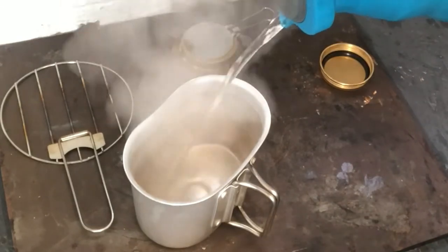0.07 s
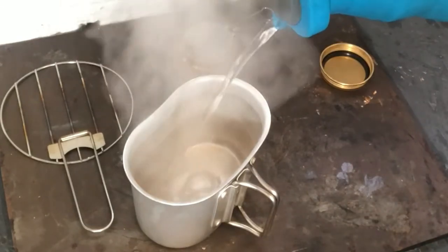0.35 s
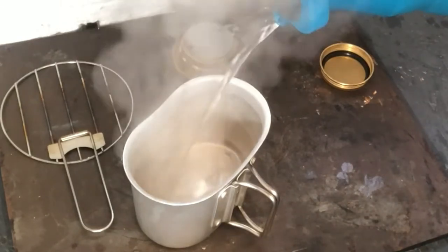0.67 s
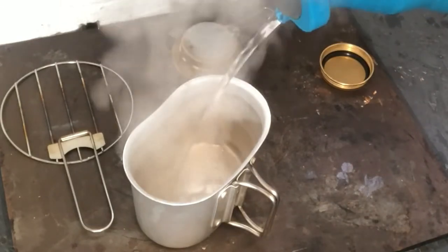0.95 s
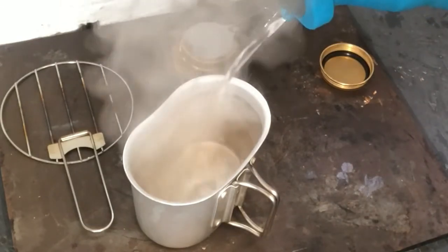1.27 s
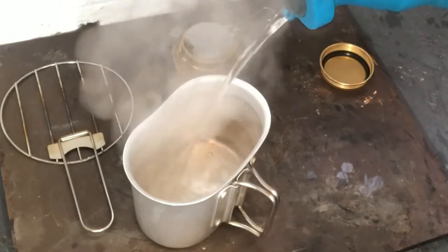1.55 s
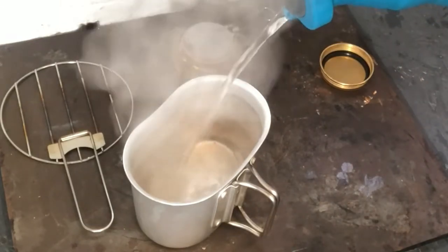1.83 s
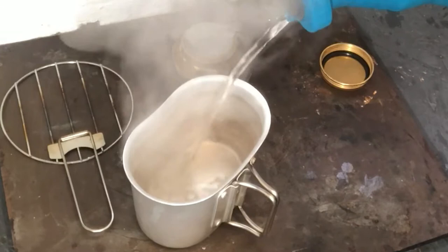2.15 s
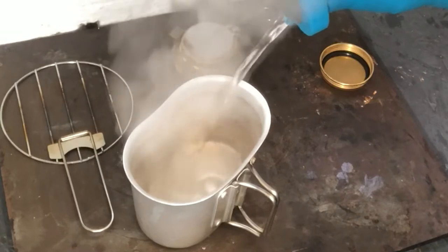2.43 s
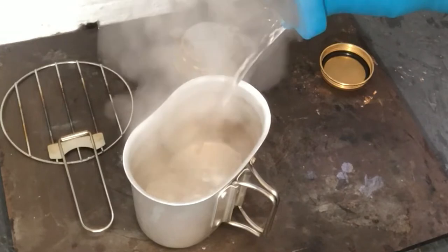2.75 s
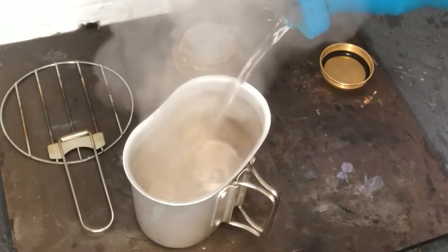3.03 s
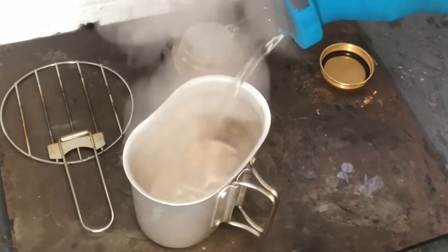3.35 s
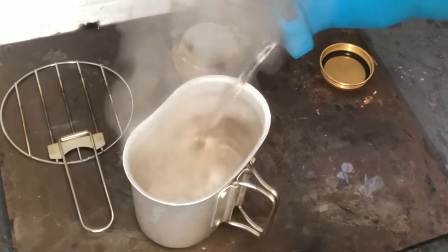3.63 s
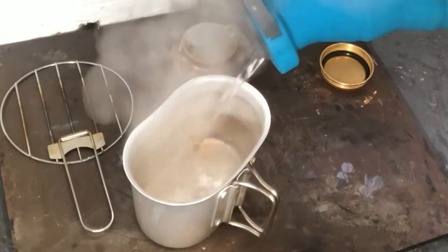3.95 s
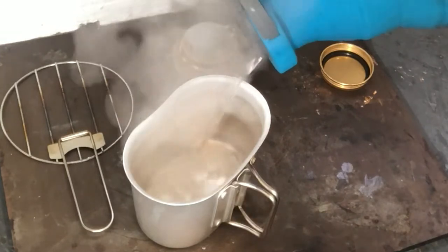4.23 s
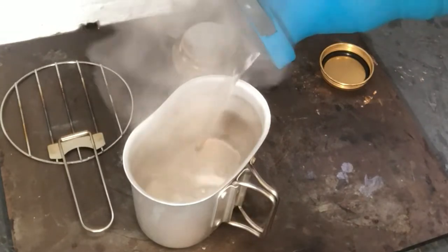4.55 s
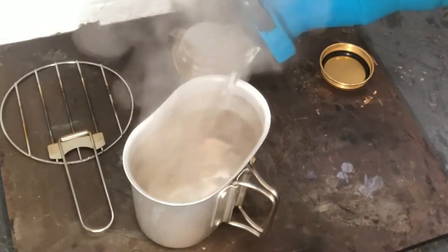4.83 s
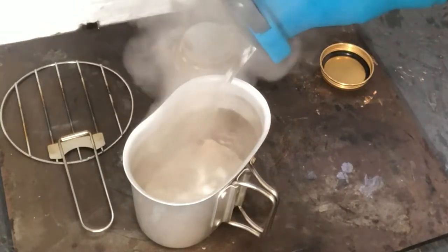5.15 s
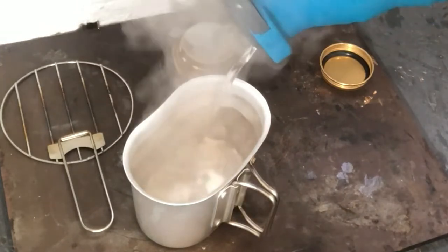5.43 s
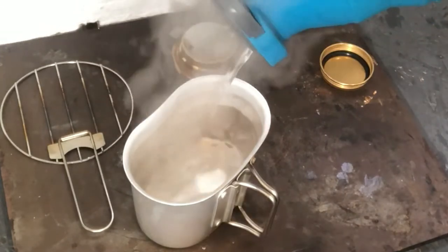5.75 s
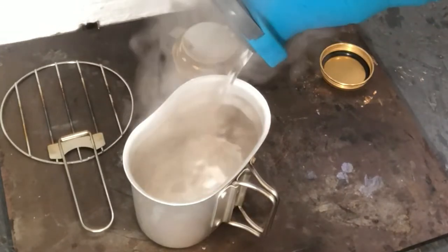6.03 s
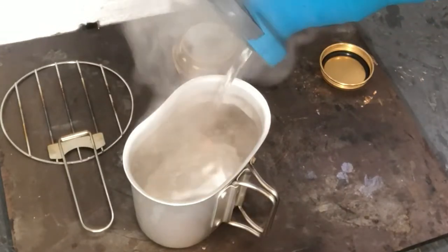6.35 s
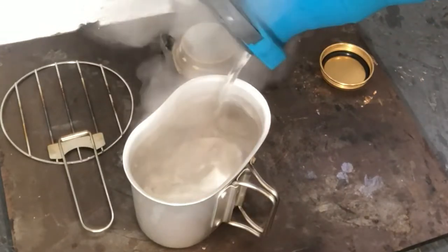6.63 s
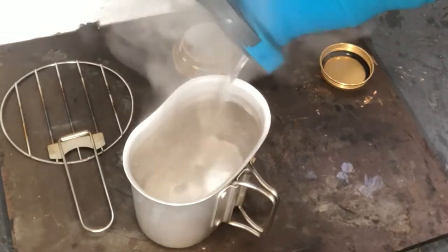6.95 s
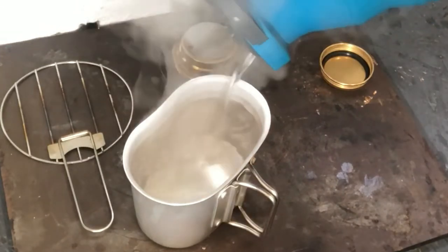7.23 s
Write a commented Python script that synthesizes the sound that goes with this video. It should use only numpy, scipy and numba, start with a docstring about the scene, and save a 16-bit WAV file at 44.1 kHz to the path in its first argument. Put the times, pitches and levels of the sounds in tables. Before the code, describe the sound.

Close stream of water drums and spatters into a metal cup, turning into a softer, rising gurgle, with a few dull handling knocks.

```python
"""Hot water runs from a kettle into a metal cup, close to a hand-held phone in a small room.
At first the stream drums on the bottom and spray ticks on the metal wall; all along, the flow surges
and handling knocks reach the microphone as low thumps. Drumming and spray fade as the bottom is covered.
Trapped bubbles ring the air in the cup, higher as it fills. Near the end, fine froth gathers
and a thin, faint whistle passes."""
import sys
import numpy as np
from scipy import signal
from scipy.fft import rfft, irfft
from scipy.io import wavfile
from scipy.ndimage import uniform_filter1d
from numba import njit

SR = 44100
rng = np.random.default_rng(int(sys.argv[2]) if len(sys.argv) > 2 else 0)


def transcribe(signal):
    """Save signal, clipped to [-1, 1], as a 16-bit WAV file at the path in sys.argv[1]."""
    frames = np.atleast_2d(signal).T
    limited = np.clip(frames, -1, 1)
    pcm = np.round(limited * 32767).astype(np.int16)
    wavfile.write(sys.argv[1], SR, pcm)


N = 321470
TIME = np.arange(N) / SR

# The main note of the air above the water. Each row: time in seconds, pitch in Hz.
AIR_NOTE = [(0, 980), (1.2, 1010), (2.3, 1067), (3.3, 1227), (4.5, 1244), (5.7, 1464), (7.3, 1390)]
# The low notes of the cup on its table. Each row: pitch in Hz, width in Hz, gain in dB.
CUP_NOTES = [(325.3, 23, -1.5), (450.4, 20, 7.5), (605, 78, -6.5), (680, 19, -18)]
# The high notes of the metal wall. Each row: pitch in Hz, width in Hz, gain in dB.
WALL_NOTES = [(2120, 60, 4), (2810, 84, 1), (3450, 40, -1), (4800, 37, -12), (5200, 60, -8), (5430, 50, 0),
              (6300, 70, -7), (8090, 70, -5)]
# Handling knocks. Each row: start in seconds, size in dB, length of the push in seconds,
# and how many seconds earlier a light touch comes.
KNOCKS = [(.333, -23.5, 0.0033, 0.0017), (0.857, -6.5, 0.0077, 0), (1.518, -9, 0.0058, 0.0025),
          (2.928, -3, .025, 0.0013), (3.097, -31.5, 0.0025, 0), (3.388, -22, 0.0033, 0.00061),
          (3.418, -22.5, 0.005, 0.0033), (3.71, -22, 0.0056, .012), (3.899, -6.5, 0.012, .01),
          (3.92, -15.5, 0.0043, 0), (3.935, -7.5, 0.013, 0.0045), (4.048, -31.5, .0032, 0),
          (4.602, -32, 0.0056, 0.0018), (4.671, -31, 0.0039, 0.0038), (5.863, -16.5, 0.0075, 0.011),
          (6.217, -27.5, 0.0027, 0.0018), (6.293, -15.5, 0.0053, 0), (6.305, -14, 0.00744, 0.0028),
          (6.331, -17.5, 0.0052, 0.0036), (6.549, -31, 0.0019, 0.00069), (6.691, -15.5, 0.0059, 0.0051),
          (6.701, -16.5, 0.0053, 0.0045), (7.03, -18, 0.0075, 0.0044), (7.055, -18.5, 0.0072, 0.0042),
          (7.089, -27, 0.0031, 0), (7.105, -16, 0.0053, 0.0031), (7.123, -15.5, 0.0065, 0.0032),
          (7.137, 4, 0.074, 0.0028), (7.209, -16.5, 0.0084, 0.0066)]


def stream(level_db, follow, surge, deep_db):
    """Gain of a water sound: it follows the flow and its surges, and shifts by deep_db in deep water."""
    # The strength of the stream. Each row: time in seconds, level in dB (-60 is the normal flow).
    flow = [(0.0, -59), (0.58, -60.5), (1.15, -57), (1.25, -54.5), (2.3, -59), (2.67, -64.5), (3.27, -61.5),
            (3.71, -63.5), (4.02, -58), (4.48, -64.5), (4.89, -66.5), (5.09, -63), (5.31, -77.5),
            (5.67, -60.5), (5.96, -69), (6.58, -64.5), (6.8, -69), (7.25, -69)]
    # Short swells of the stream. Each row: start in seconds, rise in dB, length in seconds.
    surges = [(0.144, 4.5, 0.041), (0.434, 6.5, 0.14), (0.814, 3, 0.17), (1.116, 6.5, 0.06),
              (1.342, 4, 0.059), (1.741, 5, 0.213), (2.315, 2.5, 0.046), (2.604, 9.5, 0.069),
              (2.855, 10.5, 0.096), (3.38, 5, 0.14), (4.269, 7.5, 0.1), (4.65, 5, 0.1), (4.796, 8.5, 0.047),
              (5.296, 11.5, 0.093), (5.495, 2.5, 0.091), (5.675, 7, 0.11), (6.12, 2, 0.34),
              (6.684, 7, 0.072), (7.182, 9, 0.053)]
    attack_s, release_s = 0.013, 0.012
    surge_db = sum(db * np.interp(TIME - s, [0, attack_s, length, length + release_s], [0.0012, 1, 0.97, 0])
                   for s, db, length in surges)
    return undb(level_db + follow * (curve(flow) + 60) + surge * surge_db + deep_db * covered())


def covered(from_s=1.8, until_s=3.6):
    """0 while the stream strikes the bare bottom, 1 once it falls into deep water."""
    return np.interp(TIME, [from_s, until_s], [0, 1])


def gurgle(throb_db=2.5, throb_hz=(5, 14)):
    """Trapped bubbles ring the shrinking air space, throbbing unevenly; smaller ones sound above it."""
    # The notes of the air near the rim. Each row: pitch in Hz, width in Hz, gain in dB.
    rim_notes = [(850, 16, -12), (940, 67, 11), (1060, 24, -18), (1183, 48, 2), (1340, 17, -48),
                 (1540, 28, -4)]
    large = swarm(per_s=380, lo_hz=870, hi_hz=1525, cycles=9.4, spread_db=2.5, glide=0.045)
    large = resonate(large, curve(AIR_NOTE), 230.0) + undb(-7.5) * large
    large = cup(large + undb(-5.5) * ring(large, rim_notes), body_db=10)
    small = swarm(per_s=400, lo_hz=1730, hi_hz=3320, cycles=6.9, spread_db=0, glide=0.092)
    fade_in = np.minimum(TIME / 4, 1)
    small += undb(5.5) * resonate(small, second_note(TIME), 180.0) * fade_in
    large, small = (even(room(x, early_db=-1, early_s=0.051, late_db=-7, late_s=0.3), span_s=0.36)
                    for x in (large, small))
    large *= stream(level_db=-60, follow=0.69, surge=0.93, deep_db=-2)
    small *= stream(level_db=-65, follow=0.033, surge=0.36, deep_db=-4.5)
    throb = undb(throb_db * unit(band(rng.standard_normal(N), *throb_hz)))
    return throb * (large + small)


def plops(strays_per_s=11, spread_db=9, glide=0.0072, pitch_scatter=0.075):
    """Big bubbles stand out of the gurgle: each is a short rising note that stirs the second air note."""
    # The boldest bubbles. Each row: start in seconds, relative level of the main note in dB,
    # its pitch in Hz, relative level of the second note in dB.
    big_bubbles = [(0.054, -43, 1060, -57), (0.195, -42, 1010, -61), (0.318, -43, 1010, -61),
                   (0.434, -41, 1040, -55), (0.572, -41, 950, -57), (0.771, -42, 980, -64),
                   (0.917, -39, 1000, -56), (1.149, -38, 950, -55), (1.243, -36, 1060, -61),
                   (1.359, -35, 1030, -60), (1.416, -39, 972, -62), (1.734, -42, 1070, -60),
                   (1.761, -38, 1030, -59), (1.797, -39, 1060, -58), (1.822, -39, 1050, -58),
                   (1.91, -39, 950, -61), (2.044, -41, 1030, -59), (2.334, -36, 1030, -56),
                   (2.373, -37, 1060, -62), (2.4, -40, 1070, -62), (2.533, -45, 950, -60),
                   (2.631, -38, 1060, -58), (2.911, -42, 1190, -51), (2.966, -41, 1110, -56),
                   (3.054, -43, 950, -60), (3.178, -49, 1180, -52), (3.251, -46, 1180, -61),
                   (3.437, -42, 961, -58), (3.48, -42, 1220, -57), (3.547, -45, 1270, -59),
                   (4.143, -48, 1220, -60), (4.197, -45, 1230, -56), (4.284, -39, 1240, -54),
                   (4.414, -45, 1180, -67), (4.646, -48, 1320, -59), (4.713, -49, 1170, -62),
                   (4.811, -43, 1200, -52), (4.908, -52, 1250, -60), (4.941, -51, 1260, -60),
                   (5.054, -52, 1250, -57), (5.239, -59, 1240, -55), (5.316, -47, 1270, -58),
                   (5.402, -51, 1130, -58), (5.486, -56, 1270, -54), (5.515, -49, 1210, -53),
                   (5.551, -44, 1380, -58), (5.702, -40, 1190, -57), (5.819, -45, 1240, -55),
                   (5.972, -52, 1020, -54), (6.537, -46, 1260, -56), (6.72, -45, 1360, -55),
                   (6.994, -47, 1310, -68)]
    bold = [(s, undb(db + 4.5), hz, undb(second_db + 8.5)) for s, db, hz, second_db in big_bubbles]
    s, softness, pitch = strays(strays_per_s).T
    size = undb(-spread_db * softness)
    main = size * np.interp(s, TIME, stream(level_db=-41.5, follow=1, surge=0.29, deep_db=-5))
    second = size * np.interp(s, TIME, stream(level_db=-55, follow=0.071, surge=0.98, deep_db=5.5))
    hz = np.interp(s, TIME, curve(AIR_NOTE)) * (0.917 + 0.14 * pitch)
    light = np.column_stack([s, main, hz, second])
    s, main, hz, second = np.vstack([bold, light]).T.copy()
    second_hz = second_note(s) * (1 + pitch_scatter * rng.standard_normal(len(s)))
    notes = bubbles(s, hz, cycles=np.full(len(s), 16.0), size=main, glide=glide)
    notes += bubbles(s, second_hz, cycles=np.full(len(s), 30.0), size=second, glide=glide)
    return room(cup(notes, body_db=4), early_db=-6.5, early_s=0.08, late_db=-8, late_s=0.3)


def second_note(s, start_hz=2020, rise_hz_per_s=46):
    """Pitch of the second air note, which climbs as the cup fills."""
    return start_hz + rise_hz_per_s * s


def cup(x, body_db):
    """Bubbles sound through the cup: its low notes ring along, with a gap below the air note."""
    return band(x, 882, 5300, order=4) + undb(body_db) * band(ring(x, CUP_NOTES), 310, 680, order=3)


def drumming():
    """The stream drums on the bottom of the cup, harder whenever it swells."""
    blows = swarm(per_s=600, lo_hz=234, hi_hz=800, cycles=1.85, spread_db=4, glide=0.086)
    drum = even(band(ring(blows, CUP_NOTES), 240, 1120), span_s=0.24)
    return drum * stream(level_db=-56.5, follow=0.97, surge=1, deep_db=-6.5)


def spray():
    """Fine droplets crackle and tiny bubbles ping; the tone changes as the bottom is covered."""
    # The tone of spray on shallow and on deep water. Each row: frequency in Hz, gain in dB.
    shallow_tone = [(1650, -54), (2800, 8), (3170, -9), (3530, 6), (3960, -1), (4710, 3), (5100, -3.5),
                    (5530, 2), (6860, 1), (8050, 0.5), (9100, -6), (9710, 2), (10900, 0.5), (15800, -13)]
    deep_tone = [(1650, 4), (2800, -2), (3240, -24), (3550, -5), (4290, -9), (4990, -4), (6530, -2.5),
                 (8170, -5), (8780, -10), (9230, -6), (10400, -7), (11600, -4.5), (13000, -19),
                 (15800, -28)]
    ticks = swarm(per_s=1200, lo_hz=2960, hi_hz=13700, cycles=9.5, spread_db=8.5, glide=0.32)
    ticks = np.diff(ticks, prepend=0)  # tiny sources give off treble best
    ticks += undb(-2) * ring(ticks, WALL_NOTES)
    ticks = room(ticks, early_db=-3.5, early_s=0.07, late_db=-4.5, late_s=0.25)
    fizz = swarm(per_s=580, lo_hz=2740, hi_hz=9450, cycles=38, spread_db=-1.5, glide=0.076)
    fizz = room(fizz, early_db=-3, early_s=0.077, late_db=-5.5, late_s=0.25)
    splash = unit(ticks) + undb(-5.5) * unit(fizz)
    shallow = (1 - covered()) * unit(colour(splash, shallow_tone))
    deep = covered() * unit(colour(splash, deep_tone))
    gain = stream(level_db=-61.5, follow=0.49, surge=0.73, deep_db=-3.5)
    return even(shallow + deep, span_s=0.098) * gain


def drops(strays_per_s=7, spread_db=8, crack_s=0.001, scatter_s=0.0086):
    """Each drop bursts in a short crack that the wall and the room carry on."""
    # Drops that hit the wall hard. Each row: start in seconds, relative level in dB, centre pitch in Hz.
    hard_drops = [(0.0176, -36, 9200), (0.2857, -45, 6500), (0.4355, -43, 3710), (0.536, -45, 6090),
                  (0.6575, -34.5, 8950), (0.687, -37, 4860), (0.846, -41, 3560), (0.9303, -42.5, 6490),
                  (1.1472, -31.5, 8450), (1.3098, -33.5, 5900), (1.4565, -42, 5760), (1.5922, -43, 3800),
                  (1.762, -40.5, 8400), (1.854, -35.5, 10300), (1.93, -39.5, 4600), (2.0386, -38, 7900),
                  (2.3337, -41, 7000), (2.579, -41, 5030), (3.3737, -40, 5300), (3.6126, -42.5, 6100),
                  (3.997, -45.5, 2950), (4.1225, -43.5, 6130), (4.283, -47.5, 3400), (4.816, -42.5, 7950),
                  (5.0549, -42, 7100), (5.537, -43, 9310), (5.7418, -46.5, 3580), (5.9708, -50, 7330),
                  (6.1215, -43, 6100), (6.2304, -48, 3120), (6.4014, -46, 3020), (6.7199, -40.5, 6800),
                  (6.8164, -45.5, 5140), (7.2, -40, 6300)]
    hits = [(s, undb(db + 2), hz) for s, db, hz in hard_drops]
    light = stream(level_db=-40, follow=0.23, surge=0.4, deep_db=-9)
    hits += [(s, light[int(s * SR)] * undb(-spread_db * softness), 3200 * 2.6 ** pitch)
             for s, softness, pitch in strays(strays_per_s)]
    out, t = np.zeros(N), TIME[:SR // 20]
    burst = np.exp(-t / crack_s) + undb(-17.5) * np.exp(-t / scatter_s)  # the hit, then its droplets
    for s, gain, hz in hits:
        noise = rng.standard_normal(len(t)) * burst
        crack = band(noise, 1620, 12100, order=4) + undb(-9) * band(noise, 15800, 24000)
        crack += undb(-1) * band(crack, hz / np.sqrt(2), hz * np.sqrt(2))  # lift the drop's own octave
        add(out, s, gain * crack / np.abs(crack).max())
    out += undb(-3.5) * ring(out, WALL_NOTES)
    return room(out, early_db=-0.5, early_s=0.062, late_db=-4, late_s=0.18)


def froth(level_db=-68, start_s=5.63, full_s=6.2):
    """Fine bubbles gather on the surface late in the pour."""
    fine = swarm(per_s=950, lo_hz=2130, hi_hz=3650, cycles=3, spread_db=4.5, glide=0.068)
    fine = room(fine, early_db=7, early_s=0.046, late_db=-8, late_s=0.17)
    return unit(fine) * undb(level_db) * np.interp(TIME, [start_s, full_s], [0, 1])


def knocks(touch_db=-9.5, touch_share=0.38, roughness=0.63, leak_hz=4.48, leak_width_hz=6.6):
    """A light touch, then an uneven push on the microphone; the pressure leaks away and swings back."""
    force = np.zeros(N)
    for s, db, length, lead in KNOCKS:
        touch = (s - lead, db + touch_db, length * touch_share)
        for start, size_db, span in (touch, (s, db, length)):
            count = int(span * SR)
            push = np.sin(np.pi * np.linspace(0, 1, count)) ** 0.27
            noise = band(rng.standard_normal(SR // 10), 62, 570, order=1)
            grit = unit(band(noise, 84, 2700))[-count:]
            add(force, start, undb(size_db) * push / push.sum() * (1 + roughness * grit))
    return resonate(force, np.full(N, leak_hz), leak_width_hz) * SR / (2 * np.pi * leak_width_hz)


def whistle():
    """A faint, wavering tone rises and falls."""
    # The path of the whistle. Each row: time in seconds, pitch in Hz, level in dB.
    path = [(6.17, 7600, -82), (6.22, 7600, -83), (6.31, 7900, -83), (6.345, 8300, -82), (6.375, 8350, -61),
            (6.40, 8100, -85), (6.42, 7600, -74), (6.49, 7500, -71), (6.53, 7200, -81)]
    waver = unit(band(rng.standard_normal(N), 12, 90))
    phase = 2 * np.pi * np.cumsum(curve(path) * (1 + 0.004 * waver)) / SR
    sounding = (TIME > path[0][0]) & (TIME < path[-1][0])
    return np.sqrt(2) * np.sin(phase) * undb(curve(path, column=2)) * sounding


def background(hiss_db=-62.5, shake_db=-43.5, shake_s=0.28):
    """Steady room hiss lies over a low rumble that swells after each knock."""
    # The tone of the room's hiss. Each row: frequency in Hz, gain in dB.
    hiss_tone = [(59, -13), (100, -2), (307, -1.5), (380, -7), (450, -15), (533, -14), (748, -10.5),
                 (1270, -34), (1710, -14.5), (2150, -28.5), (3290, -20.5), (6620, -23.5), (15800, -26)]
    # The rumble apart from the knocks. Each row: time in seconds, level in dB.
    rumble_levels = [(0, -41), (.75, -39.5), (1.3, -45.5), (4.2, -46), (5.2, -45), (7.2, -44)]
    # The tone of the rumble. Each row: frequency in Hz, gain in dB.
    rumble_tone = [(5, 9), (15, 2.5), (30, -5), (47, 0), (68, -14), (120, -22), (220, -31),
                   (500, -40), (2000, -81)]
    hiss = unit(colour(rng.standard_normal(N), hiss_tone)) * undb(hiss_db)
    rumble = unit(colour(rng.standard_normal(N), rumble_tone))
    shake = sum(undb(db + shake_db) * np.exp(-np.abs(TIME - s) / shake_s) * (TIME > s)
                for s, db, *_ in KNOCKS)
    return hiss + rumble * (undb(curve(rumble_levels)) + shake)


def room(x, early_db, early_s, late_db, late_s):
    """Add quick echoes from cup and table, then the room's tail; each fades 60 dB in its given time."""
    t = TIME[:SR // 2]
    response = signal.unit_impulse(len(t))
    for db, fade_s in ((early_db, early_s), (late_db, late_s)):
        tail = rng.standard_normal(len(t)) * np.exp(-np.log(1000) * t / fade_s) * (t > 1 / 2000)
        response += undb(db) * tail / np.linalg.norm(tail)
    return signal.fftconvolve(x, response)[:N]


def swarm(per_s, lo_hz, hi_hz, cycles, spread_db, glide):
    """Bubble-like pings at random times and pitches; spread_db sets how much their levels differ."""
    when, pitch, life, chance = rng.random((int(per_s * N / SR), 4)).T
    size = undb(spread_db * np.minimum(-np.log(1 - chance), 5))  # most are alike, a few differ a lot
    return bubbles(when * N / SR, lo_hz * (hi_hz / lo_hz) ** pitch, cycles * (0.5 + life), size, glide)


@njit
def bubbles(times, hz, cycles, size, glide):
    """Each bubble is a pure tone that fades 60 dB over its cycles and rises by the fraction glide."""
    out = np.zeros(N)
    for k in range(len(times)):
        start, life, phase = int(times[k] * SR), int(cycles[k] * SR / hz[k]) + 2, 0.0
        for i in range(min(life, N - start)):
            phase += 2 * np.pi * hz[k] * (1 + glide * i / life) / SR
            out[start + i] += size[k] * np.exp(-np.log(1000) * i / life) * np.sin(phase)
    return out


def strays(per_s):
    """Random events spread over the pour. Each row: start in seconds, two random numbers from 0 to 1."""
    count = int(per_s * N / SR)
    rows = rng.random((count, 3))
    starts = (np.arange(count) + rows[:, 0]) / count * N / SR
    return np.column_stack([starts, rows[:, 1:]])


def ring(x, notes):
    """Let a sound ring an object's fixed notes."""
    return sum(undb(db) * signal.lfilter(*signal.iirpeak(hz, hz / width, fs=SR), x + 1e-18)
               for hz, width, db in notes)


@njit
def resonate(x, hz, width_hz):
    """Ring one note whose pitch may move (a state-variable band-pass, gain 1 at its centre)."""
    out, mid_state, low_state = np.empty(len(x)), 0.0, 0.0
    for i in range(len(x)):
        tuning, damping = np.tan(np.pi * hz[i] / SR), width_hz / hz[i]
        mid = (mid_state + tuning * (x[i] + 1e-18 - low_state)) / (1 + tuning * (tuning + damping))
        mid_state = 2 * mid - mid_state
        low_state += 2 * tuning * mid
        out[i] = damping * mid
    return out


def band(x, lo_hz, hi_hz, order=2):
    """Keep the part of a sound between two frequencies."""
    edges = [lo_hz, min(hi_hz, SR / 2 - 1000)]
    return signal.sosfilt(signal.butter(order, edges, "band", fs=SR, output="sos"), x)


def colour(x, tone):
    """Turn each frequency up or down as a tone table says."""
    hz, db = np.transpose(tone)
    bins = np.maximum(np.fft.rfftfreq(N, 1 / SR), 1)
    return irfft(rfft(x) * undb(np.interp(np.log(bins), np.log(hz), db)), N)


def even(x, span_s):
    """Even out slow changes of level, keeping the quick flicker."""
    k = int(span_s * SR / 2)
    return x / np.sqrt(uniform_filter1d(uniform_filter1d(x ** 2, k), k) + 1e-18)


def unit(x):
    """Scale to an average (rms) level of 1."""
    return x / np.sqrt(np.mean(x ** 2))


def undb(db):
    """Turn decibels into a gain."""
    return 10 ** (np.asarray(db) / 20)


def curve(rows, column=1):
    """One column of a table, joined by straight lines in time."""
    rows = np.array(rows)
    return np.interp(TIME, rows[:, 0], rows[:, column])


def add(out, start_s, sound):
    """Mix a sound in at a given time."""
    i = max(int(start_s * SR), 0)
    out[i:i + len(sound)] += sound[:max(N - i, 0)]


def scene():
    """The pour, the knocks, the whistle and the room, in one channel."""
    water = gurgle() + drumming() + spray() + drops() + plops() + froth()
    return (water + knocks() + whistle() + background())[None]


def record(dry):
    """The phone cuts the treble above 15850 Hz."""
    return signal.sosfilt(signal.ellip(10, 0.2, 70, 15850, fs=SR, output="sos"), dry)


dry = scene()
out = record(dry)
transcribe(out)
```